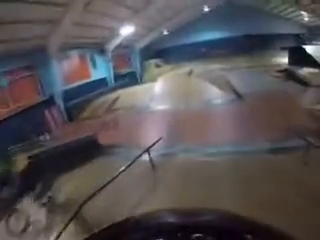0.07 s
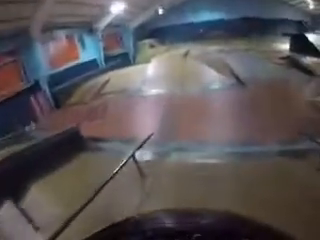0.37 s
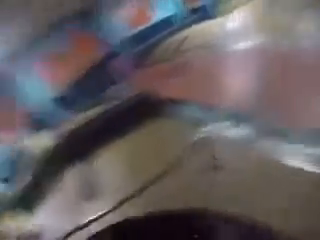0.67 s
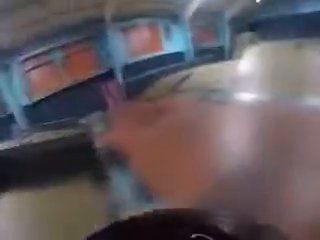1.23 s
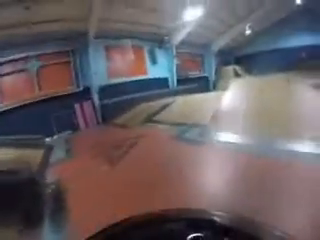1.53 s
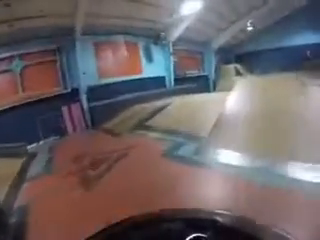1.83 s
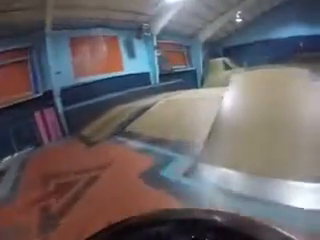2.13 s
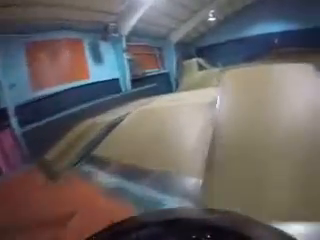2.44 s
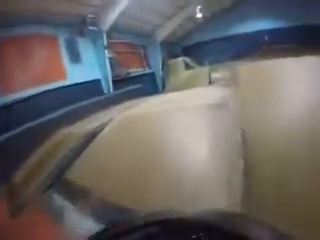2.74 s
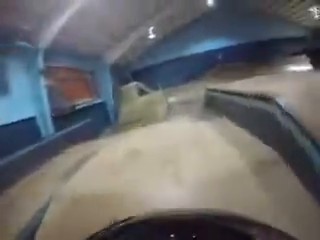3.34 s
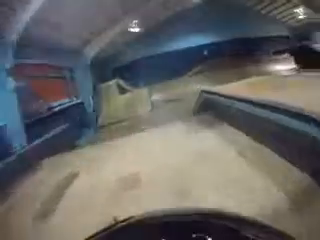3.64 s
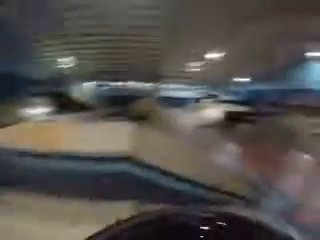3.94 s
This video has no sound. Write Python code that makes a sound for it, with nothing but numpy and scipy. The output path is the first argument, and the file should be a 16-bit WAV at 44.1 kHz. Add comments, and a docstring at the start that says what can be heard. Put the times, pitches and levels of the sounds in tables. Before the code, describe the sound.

A bicycle lands on a wooden ramp with a deep boom and metal clinks, thuds down again, then coasts with a fading freewheel whir. Air buffets the rider's helmet microphone over the rumble of an indoor skatepark.

```python
"""A bicycle lands on a wooden ramp, hops, lands again and coasts; each impact excites the deck's modes.
Steel parts clink, tyres hiss as they slow, the freewheel whirs, a wheel whines and a tyre scrubs.
All is heard from the rider's helmet, which knocks and rubs at the jolts while air buffets the microphone.
The hall of the indoor skatepark adds reverberation and a steady rumble."""
import sys
import numpy as np
from scipy import signal
from scipy.fft import rfft, irfft
from scipy.io import wavfile

SR = 44100
rng = np.random.default_rng(int(sys.argv[2]) if len(sys.argv) > 2 else 0)


def master(y):
    """Save y as 16-bit WAV."""
    cut = np.clip(np.atleast_2d(y).T, -1, 1)
    pcm = np.round(cut * 32767)  # scale
    wavfile.write(sys.argv[1], SR, pcm.astype(np.int16))


N = 176400

# spectra of the hall's rumble and of the wind (frequency [Hz], relative density [dB])
RUMBLE_SPECTRUM = [(25, 1), (60, 5), (115, -4), (170, -10.5), (280, -17.5), (420, -27), (800, -32.5),
                   (1600, -34), (4300, -45), (9000, -47.5), (15000, -53)]
WIND_SPECTRUM = [(15, 8), (28, 8), (48, -4.5), (70, -12), (110, -10.5), (170, -30), (700, -79)]
# air on the microphone: its envelope, and single gusts as the head jerks (time [s], level [dB])
WIND_LEVEL = [(0, -35), (.1, -20), (.18, -19), (.36, -19.5), (.45, -30.5), (.56, -24), (1.05, -31),
              (1.58, -27.5), (1.8, -44), (2.0, -36.5), (2.6, -39), (3.27, -26.5), (3.47, -37), (4, -37.5)]
GUSTS = [(0.537, -14.5), (.787, -21), (1.303, -17.5), (1.342, -13), (1.581, -19.5), (2.344, -26.5),
         (3.026, -13.5), (3.256, -24.5), (3.299, -23)]
# resonances of distant metal (frequency [Hz], bandwidth [Hz], level [dB])
FAR_BANDS = [(3530, 170, -59.5), (5430, 500, -70), (9650, 500, -72)]

# helmet and straps rubbing (centre [s], half length [s], level [dB], relative scratch [dB])
RUBS = [(1.188, 0.032, -40.5, -1), (1.252, 0.019, -43, -9), (1.315, 0.011, -40, -14),
        (1.402, 0.029, -43, -0.5), (1.449, 0.023, -48, -1), (1.58, 0.016, -44, -33),
        (2.306, 0.019, -51, -16), (2.668, 0.07, -53.5, -20), (2.851, 0.016, -53.5, -25),
        (2.99, 0.02, -41.5, -21), (3.068, 0.027, -47, -26), (3.144, 0.017, -50.5, -28),
        (3.26, 0.035, -55.5, -5.5), (3.355, 0.023, -56.5, -2.5), (3.759, 0.031, -45.5, -8),
        (3.911, 0.054, -43, -25)]
# spectra of the helmet's rub, scratch and crack (frequency [Hz], relative density [dB])
RUB_SPECTRUM = [(100, 8), (260, -3), (400, -9.5), (600, 4), (800, -11), (1150, -12.5), (1350, 2.5),
                (1950, 0), (2250, -5), (2700, -4), (3200, -17), (3750, -7), (4800, -24), (7000, -33),
                (12000, -52)]
SCRATCH_SPECTRUM = [(250, -6.5), (420, 7), (620, 1), (800, 6.5), (950, 12.5), (1200, 3.5), (3600, 2),
                    (4600, -4), (8500, -16), (10500, -33)]
CRACK_SPECTRUM = [(150, 14), (300, 13), (420, 3.5), (800, 2), (1600, 8), (2800, 7), (4000, -5), (6000, -14),
                  (15000, -34)]
# knocks through the helmet (time [s], level [dB], decay time [s], relative ring [dB])
KNOCKS = [(0.0618, -44, 0.0061, -6), (0.130, -30.5, 0.0065, 1.5), (.138, -30, 0.032, 8),
          (0.145, -36.5, .006, 8), (0.802, -23.5, 0.0041, -15), (3.942, -37, 0.0021, -19.5)]
# modes of the helmet shell (frequency [Hz], relative level [dB], T60 [s])
SHELL_MODES = [(283.5, 5.5, 0.075), (922, -6.5, 0.13), (1187, -11, 0.16), (1390, -6, 0.16),
               (1598, 1, 0.056), (1775, -4, 0.12), (2410, -9, 0.05), (3530, -6, 0.06)]

# whine of the spinning wheel (time [s], pitch [Hz], relative fundamental [dB], relative octave [dB])
WHINE_TRACK = [(.195, 5450, -49, -60), (.25, 5400, -46.5, -67), (.32, 5360, -44, -52),
               (.37, 5400, -54, -53), (.43, 5230, -48.5, -49), (.49, 4900, -60, -45.5),
               (.57, 4760, -72, -71), (.65, 4650, -78, -70)]
# envelopes of the freewheel, its highest resonance and the rolling tyres (time [s], level [dB])
FREEWHEEL_LEVEL = [(0, -51.5), (1.2, -54.5), (1.5, -46.5), (1.75, -51), (2.15, -59), (2.8, -71),
                   (3.15, -86), (3.3, -63), (3.6, -67), (4, -72)]
SIZZLE_LEVEL = [(0, -87), (.16, -60), (.76, -59.5), (.9, -66), (1.13, -67.5), (1.25, -64.5), (2.2, -81.5),
                (4, -87)]
TYRE_LEVEL = [(0, -58.5), (.125, -49), (.15, -35), (.25, -37), (.47, -39), (.75, -44), (.95, -50),
              (1.45, -52), (1.8, -57), (2.2, -61.5), (3.0, -60.5), (4, -63)]
# resonances of the hub and of the tyre rubber (frequency [Hz], bandwidth [Hz], relative level [dB])
HUB_BANDS = [(1680, 660, -13.5), (2720, 1010, 2), (3590, 260, -1.5), (4004, 370, -6), (5550, 1600, -11.5)]
RUBBER_BANDS = [(1430, 290, 0.5), (1850, 520, 3), (2620, 390, -8)]
# spectra of tread on plywood and of metal on metal (frequency [Hz], relative density [dB])
TYRE_SPECTRUM = [(400, -13.5), (690, -13), (979, -3), (1310, 0.5), (1610, 3.5), (2150, -1.5), (2870, 2),
                 (3190, -5), (3500, 3.5), (4960, -15), (5430, -11.5), (9090, -19.5), (10100, -46),
                 (11400, -25), (12900, -18.5), (15000, -23.5)]
TICK_SPECTRUM = [(1500, -10), (3500, 13), (6000, -3), (8500, -1), (10500, -11), (12000, -21), (15000, -23)]

# chain rattles at touch-down (centre [s], half length [s], level [dB])
RATTLES = [(1.18, 0.016, -35), (1.413, 0.014, -45)]
# clinks of chain and spokes (time [s], level [dB], resonance [Hz], decay time [s])
CLINKS = [(0.0626, -38, 5700, 0.0018), (0.135, -39.5, 5740, 0.0096), (0.199, -33, 6080, 0.0023),
          (0.234, -26, 3600, 0.0098), (0.277, -37, 3320, 0.0035), (0.47, -41, 5900, 0.0048),
          (1.158, -30.5, 3980, 0.0048), (1.172, -35.5, 2960, 0.0067), (1.18, -32.5, 2960, 0.019),
          (1.186, -37, 5730, 0.0056)]
# modes of a small steel part, the plywood and the deck (frequency [Hz], relative level [dB], T60 [s])
STEEL_MODES = [(3914, 0.5, 0.06), (4940, -6, 0.065), (5980, -3, .05), (7800, -2, 0.079),
               (8470, -2.5, 0.042), (9600, -9, .04), (10400, -10, .04), (14400, -10, .04)]
PLYWOOD_MODES = [(247.8, -1.5, 0.2), (348, -7, 0.15), (623, -10.5, 0.089), (950, -23, 0.054)]
THUD_MODES = [(97.8, 0.5, 0.19), (128.3, -3.5, 0.165)]
# spectrum of the deck's boom (frequency [Hz], relative density [dB])
BOOM_SPECTRUM = [(30, -11.5), (50, 5), (70, 1), (100, 0.5), (130, -4), (190, -15.5), (280, -13.5),
                 (400, -35.5), (800, -70)]
# wheels hitting the deck (time [s], boom [dB], boom decay time [s], thud [dB], plywood knock [dB])
LANDINGS = [(.08, -29, 0.027, -22.5, -57), (0.131, -17.5, 0.23, -21.5, -21),
            (1.145, -31.5, 0.094, -17, -31), (1.189, -36, 0.037, -25.5, -32.5),
            (1.371, -27, 0.11, -19.5, -31), (2.629, -45.5, 0.3, -44, -64), (2.971, -36.5, 0.058, -31, -51),
            (3.742, -32.5, 0.019, -30.5, -45), (3.903, -31, 0.022, -24, -40)]

HALL_T60_S, HALL_DAMPING_HZ, HALL_DELAY_S = 0.99, 6140, 0.0068
HIT_WET_DB, HUB_WET_DB, WHINE_WET_DB, FRICTION_WET_DB = -13.5, 15, -4.5, -13
BOOM_ATTACK_S, THUD_ATTACK_S = 0.015, 0.012


def undb(db):
    """Amplitude ratio of a level in decibels."""
    return 10 ** (np.asarray(db) / 20)


def unit(x):
    """Normalisation to an rms of 1."""
    return x / np.sqrt(np.mean(x ** 2) + 1e-20)


def clock():
    """Time of each sample in seconds."""
    return np.arange(N) / SR


def curve(rows, column=1):
    """Linear interpolation of one table column in time."""
    rows = np.array(rows)
    return np.interp(clock(), rows[:, 0], rows[:, column])


def noise():
    """Gaussian white noise."""
    return rng.standard_normal(N)


def grains(per_s, scatter_db):
    """Shot noise: random impulses of unequal size."""
    occurs = rng.random(N) < per_s / SR
    return occurs * np.sign(noise()) * undb(scatter_db * np.clip(noise(), -2, 2))


def colour(x, spectrum):
    """Spectral shaping with a roll-off below the lowest point, at unit rms."""
    hz, db = np.array(spectrum).T
    freqs = np.maximum(np.fft.rfftfreq(N, 1 / SR), 1)
    roll_off = np.minimum(freqs / hz.min(), 1) ** 2
    gain = undb(np.interp(np.log(freqs), np.log(hz), db))
    return unit(irfft(rfft(x) * roll_off * gain, N))


def resonate(x, hz, width):
    """Forced response of two equal resonators in cascade, at unit rms."""
    b, a = signal.iirpeak(min(hz, SR * .45), hz / width, fs=SR)
    return unit(signal.lfilter(b, a, signal.lfilter(b, a, x)))


def even(x):
    """Envelope compression softens the chance swells of a noise."""
    return unit(x / np.sqrt(np.abs(signal.hilbert(x)) + 0.17))


def strike(start, attack, decay, hold=0):
    """Linear rise, optional hold and exponential decay."""
    age = clock() - start
    return np.clip(age / attack, 0, 1) * np.exp(-np.maximum(age - attack - hold, 0) / decay)


def swell(centre, half):
    """Gaussian envelope: a bell-shaped rise and fall."""
    return np.exp(-.5 * ((clock() - centre) / half * 1.21) ** 2)


def ring(modes, start):
    """Free vibration: damped sinusoids, slightly detuned on every blow."""
    age = np.maximum(clock() - start, 0)
    out = 0
    for hz, db, t60 in modes:
        detuned_hz = hz * (1 + .006 * rng.standard_normal())
        out += undb(db - 60 * age / t60) * np.sin(2 * np.pi * detuned_hz * age)
    return out


def hall(x):
    """Reverberation: convolution with a diffuse tail whose treble decays twice as fast."""
    tail = noise()
    dull = signal.lfilter(*signal.butter(1, HALL_DAMPING_HZ, fs=SR), tail)
    fade = strike(HALL_DELAY_S, 0.015, HALL_T60_S / np.log(1000))
    response = dull * fade + (tail - dull) * fade ** 2
    return signal.fftconvolve(x, response / np.linalg.norm(response))[:N]


def hall_rumble(db=-45):
    """Stationary noise, strongest in the bass, forms the background of the hall."""
    return undb(db) * colour(noise(), RUMBLE_SPECTRUM)


def far_ring(start=3.23):
    """Damped resonance: one faint metallic ring from across the hall."""
    metal = sum(undb(db) * resonate(noise(), hz, width) for hz, width, db in FAR_BANDS)
    return metal * strike(start, attack=0.023, decay=0.12)


def gust(centre, half_s=0.0095):
    """A passing eddy gives a pressure dip between two softer rises."""
    offset_squared = ((clock() - centre) / half_s) ** 2
    return (offset_squared - 1) * np.exp(-offset_squared / 2)


def wind():
    """Turbulence buffets the microphone with low-frequency pressure swings and single gusts."""
    buffet = undb(curve(WIND_LEVEL)) * even(colour(noise(), WIND_SPECTRUM))
    return buffet + sum(undb(db) * gust(s) for s, db in GUSTS)


def helmet_rubs():
    """Stick-slip impulses are filtered by the helmet shell; hard rubs add a broad scratch."""
    body = colour(grains(per_s=3500, scatter_db=1), RUB_SPECTRUM)
    scratch = colour(grains(per_s=9000, scatter_db=1.9), SCRATCH_SPECTRUM)
    return sum(undb(db) * swell(s, half) * (body + undb(scratch_db) * scratch)
               for s, half, db, scratch_db in RUBS)


def helmet_knocks():
    """Impact excitation: a short crack, then free vibration of the shell."""
    crack = colour(noise(), CRACK_SPECTRUM)
    return sum(undb(db) * (crack * strike(s, 0.0018, decay) + undb(ring_db) * ring(SHELL_MODES, s))
               for s, db, decay, ring_db in KNOCKS)


def squeak(db=-47.5):
    """Narrow-band noise swells into a brief squeak before the first landing."""
    return undb(db) * swell(centre=0.025, half=0.016) * resonate(noise(), hz=2790, width=220)


def wheel_whine(jitter=0.0061):
    """Random frequency and amplitude modulation roughen the wheel's two sinking harmonics."""
    hz = curve(WHINE_TRACK) * (1 + jitter * resonate(noise(), 90, 250))
    phase = 2 * np.pi * np.cumsum(hz) / SR
    fundamental = undb(curve(WHINE_TRACK, column=2)) * np.sin(phase)
    octave = undb(curve(WHINE_TRACK, column=3)) * np.sin(2 * phase)
    sounding = (clock() > WHINE_TRACK[0][0]) & (clock() < WHINE_TRACK[-1][0])
    flutter = .5 + .2 * resonate(noise(), 42, 130)
    return sounding * flutter * np.sqrt(2) * (fundamental + octave)


def freewheel_sizzle():
    """The freewheel's highest resonance sounds as a narrow band of noise."""
    return undb(curve(SIZZLE_LEVEL)) * resonate(noise(), hz=10250, width=1400)


def freewheel(pawl_hz=171.5, jitter=0.047, click_decay_s=0.00047):
    """A nearly periodic train of pawl impacts drives the hub's resonances and reverberates."""
    teeth_passed = np.cumsum(pawl_hz * (1 + jitter * resonate(noise(), 30, 50))) / SR
    clicks = np.diff(np.floor(teeth_passed), prepend=0) * undb(noise())
    chatter = signal.lfilter([1], [1, -np.exp(-1 / (click_decay_s * SR))], clicks) * noise()
    hub = unit(sum(undb(db) * resonate(np.roll(chatter, k), hz, width) * (-1) ** k
                   for k, (hz, width, db) in enumerate(HUB_BANDS)))
    return undb(curve(FREEWHEEL_LEVEL)) * unit(hub + undb(HUB_WET_DB) * hall(hub))


def tyre_scrub(start=3.843, level_db=-41.5, slip_hz=150, jitter=0.18):
    """Stick-slip friction in the last turn drives the rubber's resonances with uneven bursts."""
    cycles = np.cumsum(slip_hz * (1 + jitter * resonate(noise(), slip_hz / 2, slip_hz))) / SR
    slips = np.exp(-2 * (cycles % 1)) * noise()
    rubber = unit(sum(undb(db) * resonate(slips, hz, width) for hz, width, db in RUBBER_BANDS))
    return undb(level_db) * strike(start, attack=0.012, decay=0.039, hold=0.036) * even(rubber)


def tyre_roll():
    """Rolling noise: dense tread impacts on wood merge into a hiss that fades as the bicycle slows."""
    return undb(curve(TYRE_LEVEL)) * colour(grains(per_s=14000, scatter_db=2.9), TYRE_SPECTRUM)


def chain_rattles():
    """Many tiny link collisions add up to short bursts of shot noise."""
    links = colour(grains(per_s=1450, scatter_db=4.9), TICK_SPECTRUM)
    return links * sum(undb(db) * swell(s, half) for s, half, db in RATTLES)


def clinks(tick_db=-13, relative_width=0.11):
    """Colliding metal parts radiate a broadband tick and a quickly damped resonance."""
    tick = undb(tick_db) * colour(noise(), TICK_SPECTRUM)
    out = 0
    for s, db, hz, decay in CLINKS:
        metal = even(resonate(noise(), hz, hz * relative_width))
        out += undb(db) * strike(s, 0.00062, decay) * (tick + metal)
    return out


def steel_snap(start=.102, db=-38.5, crack_db=-10):
    """Impulse response of a small steel part that snaps: a bright crack and briefly ringing modes."""
    bright = unit(np.diff(noise(), prepend=0))
    crack = undb(crack_db) * bright * strike(start, attack=1 / SR, decay=0.01)
    return undb(db) * (crack + ring(STEEL_MODES, start))


def ramp_flex(start=.131, hz=52.28, db=-12.5):
    """The heaviest landing sets the whole ramp vibrating in its fundamental mode."""
    mode = np.sin(2 * np.pi * hz * (clock() - start))
    return undb(db) * strike(start, THUD_ATTACK_S, decay=0.21) * mode


def deck_landings():
    """Each wheel impact excites a low thud, the modes of the hollow plywood and a noisy boom."""
    boom = even(colour(noise(), BOOM_SPECTRUM))
    out = 0
    for s, boom_db, decay, thud_db, plywood_db in LANDINGS:
        onset = np.clip((clock() - s) / THUD_ATTACK_S, 0, 1)
        modes = undb(thud_db) * ring(THUD_MODES, s) + undb(plywood_db) * ring(PLYWOOD_MODES, s)
        out += onset * modes + undb(boom_db) * boom * strike(s, BOOM_ATTACK_S, decay)
    return out


def scene():
    """Superposition of the direct sounds and the reverberation of hits, whine and friction, in mono."""
    hits = helmet_knocks() + clinks() + chain_rattles() + steel_snap()
    whine = wheel_whine() + squeak()
    friction = helmet_rubs() + tyre_scrub()
    echo = hall(undb(HIT_WET_DB) * hits + undb(WHINE_WET_DB) * whine + undb(FRICTION_WET_DB) * friction)
    ramp = deck_landings() + ramp_flex()
    coasting = tyre_roll() + freewheel() + freewheel_sizzle()
    background = far_ring() + wind() + hall_rumble()
    return (background + echo + friction + whine + coasting + hits + ramp)[None]


def record(dry, cutoff_hz=15350):
    """Band limiting: a steep low-pass filter removes the top of the treble."""
    return signal.sosfilt(signal.ellip(10, .2, 80, cutoff_hz, fs=SR, output="sos"), dry)


dry = scene()
out = record(dry)
master(out)
```